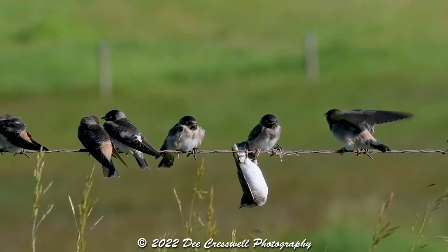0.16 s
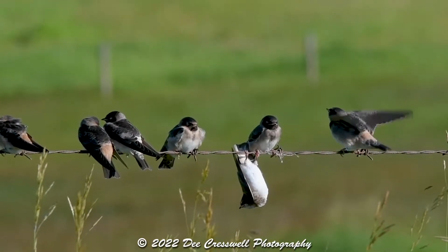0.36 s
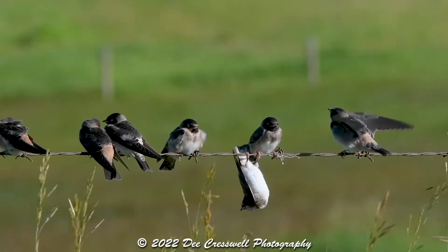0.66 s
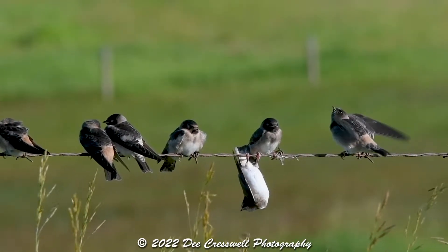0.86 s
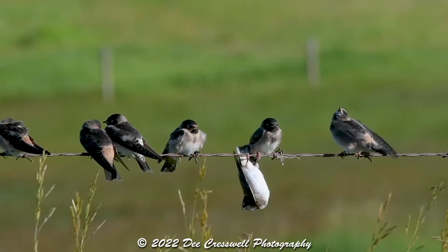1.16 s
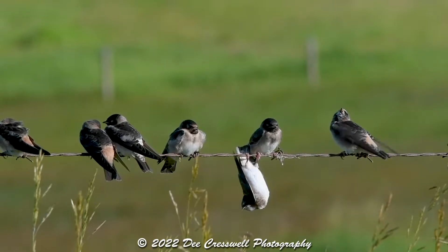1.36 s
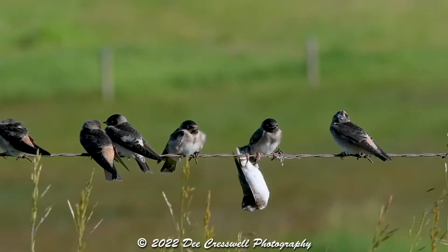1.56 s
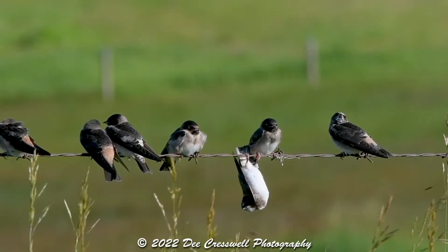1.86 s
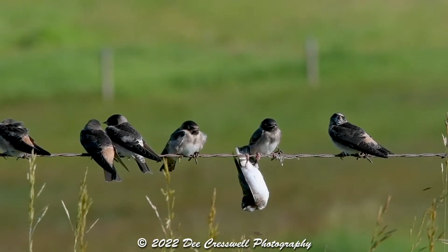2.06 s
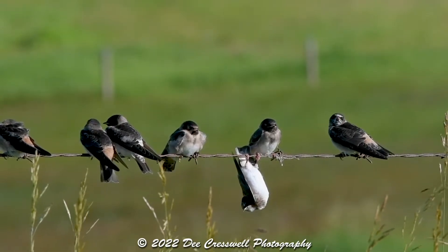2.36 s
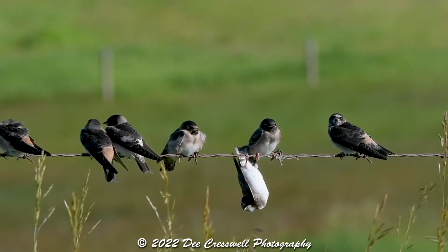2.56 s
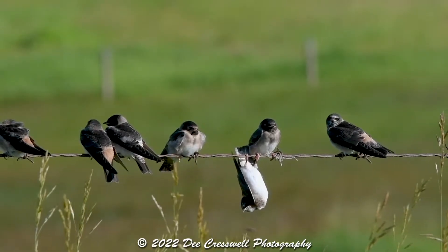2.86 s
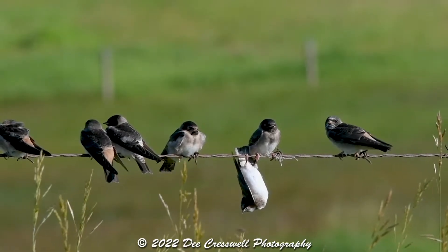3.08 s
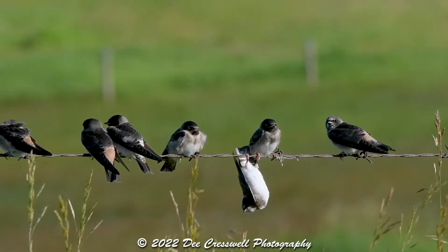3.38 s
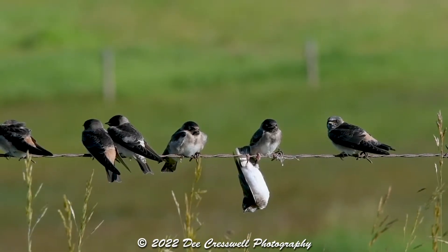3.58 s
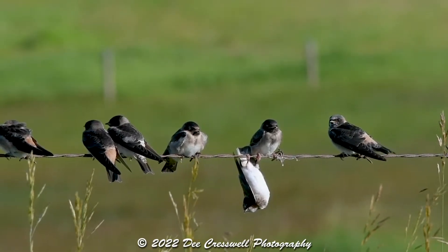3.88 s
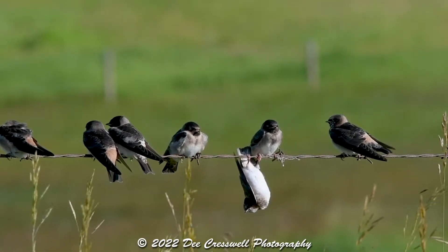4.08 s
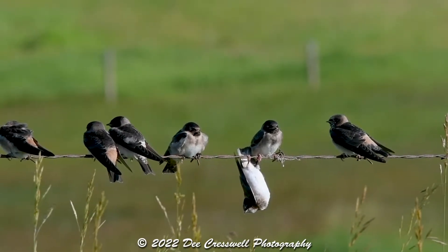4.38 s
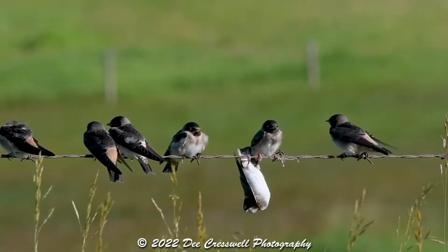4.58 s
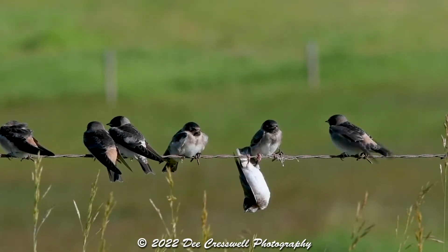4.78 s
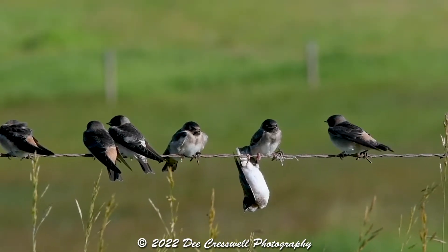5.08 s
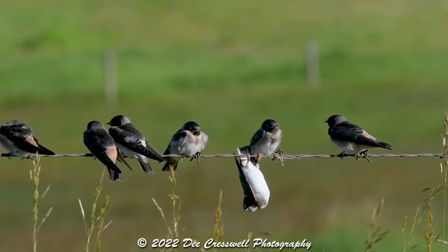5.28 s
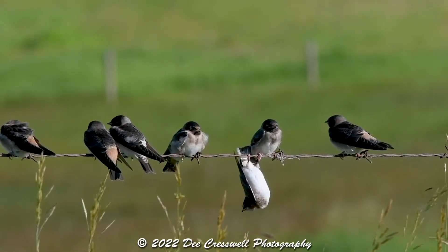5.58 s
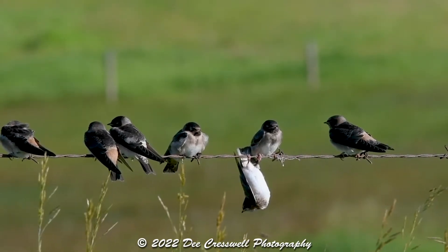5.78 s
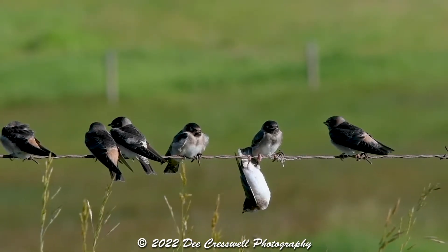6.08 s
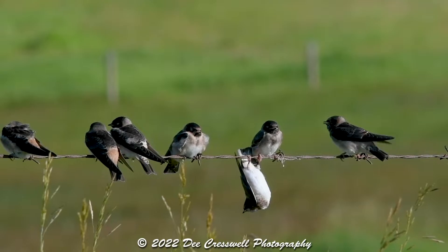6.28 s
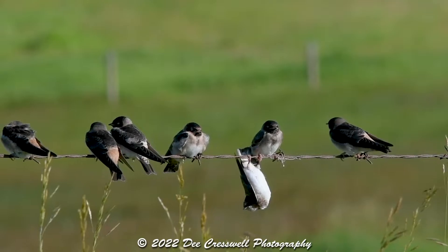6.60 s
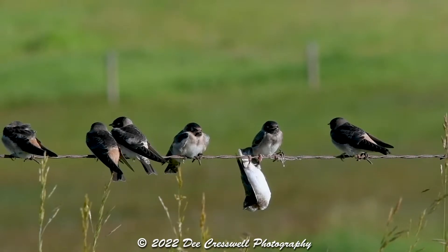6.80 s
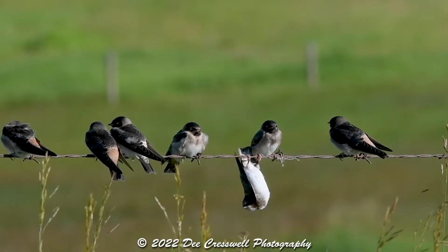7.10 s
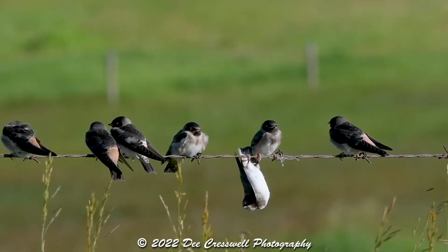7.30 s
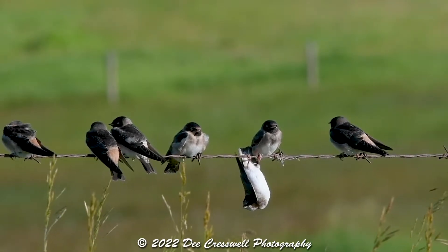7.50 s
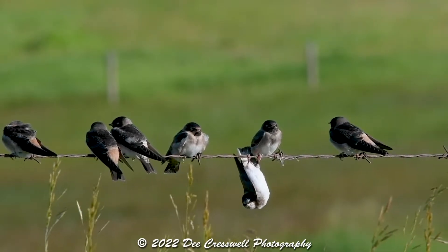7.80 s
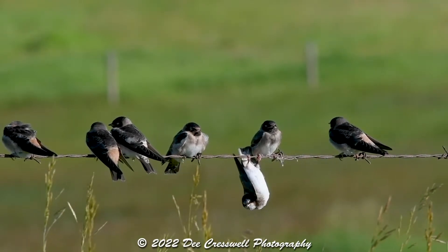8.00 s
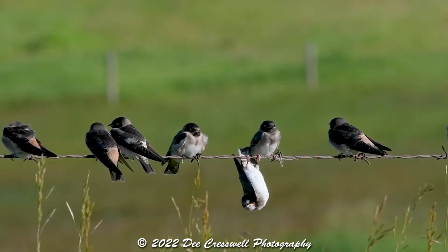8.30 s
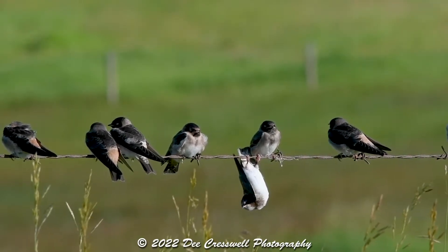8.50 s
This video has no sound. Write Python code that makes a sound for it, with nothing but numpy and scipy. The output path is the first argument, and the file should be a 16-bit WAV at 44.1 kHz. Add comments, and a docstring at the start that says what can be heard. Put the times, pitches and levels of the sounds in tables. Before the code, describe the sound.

Young swallows twitter outdoors in a quiet open field, centred and fairly close, with more of the flock chattering behind. From 0 seconds, short raspy chirps begin over two soft low microphone thumps. By 0.5 to 1.3 they overlap densely, each a quick rising lead-in and a fast buzzy warble. A lull around 1.3 to 1.6 leaves faint distant birds. Chatter resumes until 2.6, with sharp upward whistles, a hoarse low begging note near 2.0 and the strongest dull thump near 2.2. More bursts follow at 2.65 and 3.0, then a pause around 3.4 with another bump. From 4.1 to 5.9 the twittering is nearly continuous, thinning around 6.4. A bright, lively flurry peaks near 6.7 to 7.0 and calls continue to 8.6, with a short gap near 8.3. Weak wind rumble slowly eases underneath; a light grass rustle swells around 8.0. Almost no echo.

```python
"""Swallows twittering on a fence wire

Young swallows twitter with overlapping calls on a wire in an open field, the rest of the flock behind. Each
call is a rising lead-in and a fast warble: frequency modulation of two voices, one from each side of the
syrinx. Slurs are rising sinusoids, low hoarse notes are slower warbles, and rasp adds shaped noise. Low thumps
are damped oscillations of the microphone mount; filtered noise gives wind, grass and distance. A wavering far
tone lies under the very quiet countryside."""
import sys
import numpy as np
from scipy import signal
from scipy.fft import rfft, irfft, next_fast_len
from scipy.io import wavfile
from scipy.ndimage import uniform_filter1d

SR = 44100
rng = np.random.default_rng(int(sys.argv[2]) if len(sys.argv) > 2 else 0)


def unload_wav(signal):
    """Save mono or channel-first audio to the path in sys.argv[1] as 16-bit WAV at rate SR, clipped to [-1, 1]."""
    wavfile.write(
        sys.argv[1],
        SR,
        np.round(np.clip(np.atleast_2d(signal).T, -1, 1) * 32767).astype(np.int16),
    )


N = 381465
TIME = np.arange(N) / SR

# Bird levels hold before the shared colouring of beaks and air.
# Twitters on the wire: start_s, first_crest_s, end_s, pitch_hz, warble_rate_hz, level_db,
# second_voice_db (relative to the first voice, before SECOND_TRIM_DB)
TWITTERS = [(0.051, 0.1, .148, 2973, 43.1, -60.5, 1.5), (.18, 0.217, .295, 2878, 43.1, -61, 5),
            (.31, 0.36, .41, 3210, 41, -72, 16.5), (.546, 0.556, .592, 3330, 53.3, -52, -34),
            (0.589, .607, .67, 3326, 31.7, -51.5, -29), (0.681, 0.765, .83, 3430, 37.3, -64, -3),
            (.71, .742, .83, 4500, 43.6, -60, -1.5), (0.841, 0.859, .925, 3316, 36, -51, -23),
            (.87, .921, 1.01, 3265, 45.1, -54.5, -25), (0.894, 0.943, 1.035, 3344, 42.4, -50.5, -21),
            (1.01, 1.058, 1.12, 3230, 31.2, -63, 6), (1.126, 1.17, 1.2, 3345, 73, -51.5, -17),
            (1.19, 1.217, 1.29, 3415, 38.8, -54.5, -41), (1.585, 1.601, 1.635, 3090, 49.7, -69.5, -14),
            (1.649, 1.692, 1.73, 3290, 31.4, -58, -14), (1.745, 1.782, 1.87, 3343, 54.7, -50, -8.5),
            (1.77, 1.81, 1.87, 3470, 43.3, -48, -0.5), (1.879, 1.917, 2.02, 3400, 32.64, -52.5, -23),
            (1.92, 1.969, 2.02, 3540, 39, -56.5, -15), (2.03, 2.108, 2.19, 3706, 46, -54.5, -3),
            (2.071, 2.097, 2.185, 3336, 39, -56, -12), (2.193, 2.256, 2.315, 3350, 56.3, -51, -19),
            (2.298, 2.326, 2.37, 3460, 36.8, -53.5, -35), (2.38, 2.417, 2.46, 3800, 29.1, -58.5, -28),
            (2.444, 2.505, 2.562, 3440, 34, -52, -33), (2.641, 2.683, 2.735, 3150, 48.6, -52, -21),
            (2.76, 2.789, 2.85, 4670, 44, -56.5, -17), (2.795, 2.833, 2.91, 3080, 45.4, -59.5, -2.5),
            (3.02, 3.056, 3.11, 3750, 47.5, -61, 10), (3.045, 3.095, 3.135, 3140, 54.7, -49.5, -14),
            (3.124, 3.187, 3.225, 3660, 29.9, -51, -7.5), (3.227, 3.268, 3.32, 3373, 49.9, -53.5, -5),
            (3.53, 3.57, 3.62, 3940, 29.1, -69, -7), (3.606, 3.648, 3.72, 3055, 54.6, -48.5, -16),
            (3.638, 3.676, 3.75, 3463, 34.2, -54.5, -13), (3.725, 3.757, 3.775, 3050, 29.3, -46.5, -5),
            (3.836, 3.882, 3.96, 3670, 32.66, -61.5, 1.5), (4.091, 4.132, 4.21, 3834, 41.3, -49.5, -5),
            (4.117, 4.149, 4.24, 3350, 52.5, -52.5, 3.5), (4.242, 4.285, 4.335, 3490, 34.3, -50, -27),
            (4.37, 4.406, 4.455, 3460, 31.1, -53.5, -19), (4.342, 4.374, 4.45, 3960, 43.2, -56.5, 0.5),
            (4.448, 4.471, 4.525, 3390, 30.5, -54.5, -10), (4.523, 4.539, 4.62, 2790, 25, -61, -11),
            (4.579, 4.612, 4.692, 3054, 32.26, -53.5, -29), (4.684, 4.713, 4.76, 3100, 31.6, -52.5, -4),
            (4.832, 4.878, 4.93, 3175, 54.7, -48, -5), (4.921, 4.958, 5.02, 3500, 25.1, -61.5, -19),
            (5.04, 5.085, 5.155, 3636, 30.76, -48, -16), (5.044, 5.068, 5.135, 3317, 49.9, -46, -13),
            (5.124, 5.184, 5.215, 3690, 30.1, -57.5, -6), (5.218, 5.252, 5.33, 3700, 33.35, -53.5, -8),
            (5.294, 5.357, 5.425, 3150, 36.6, -51, -25), (5.342, 5.379, 5.42, 3430, 50.5, -53, -26),
            (5.42, 5.445, 5.53, 3890, 33.4, -65, -11), (5.56, 5.626, 5.68, 2850, 30, -71.5, -3),
            (5.676, 5.729, 5.79, 3776, 51.1, -57.5, 5.5), (5.763, 5.797, 5.85, 3570, 34.2, -50, -3),
            (5.824, 5.861, 5.91, 3160, 40.5, -63.5, -29), (6.018, 6.062, 6.12, 3600, 35, -55.5, -1),
            (6.059, 6.077, 6.135, 3310, 31.45, -54, -3), (6.128, 6.147, 6.23, 3286, 31, -50, -22),
            (6.212, 6.266, 6.37, 3850, 41.7, -60, -16), (6.528, 6.57, 6.67, 3236, 32.15, -60, 1),
            (6.668, 6.698, 6.79, 3470, 38.27, -48.5, -16), (6.71, 6.747, 6.83, 3532, 34.9, -48.5, -3),
            (6.816, 6.845, 6.88, 3470, 73, -48, -25), (6.876, 6.914, 6.97, 3730, 42.2, -46, -3),
            (6.901, 6.96, 7.022, 3195, 59.7, -45, -9), (7.015, 7.027, 7.08, 3850, 31.2, -61.5, -3),
            (7.08, 7.129, 7.2, 4750, 43.3, -57, -2.5), (7.098, 7.132, 7.255, 3340, 32.5, -52.5, -28),
            (7.269, 7.323, 7.375, 3370, 30.6, -56.5, -6), (7.38, 7.429, 7.53, 3430, 43.2, -50, -11),
            (7.44, 7.477, 7.6, 3486, 40.8, -58.5, -11), (7.518, 7.559, 7.63, 3770, 34.9, -67, 8.5),
            (7.657, 7.728, 7.77, 3008, 39.8, -62, 6.5), (7.85, 7.904, 7.965, 3460, 34.35, -50.5, -30),
            (7.966, 7.985, 8.08, 3354, 37.04, -50, -4), (8.062, 8.118, 8.2, 3470, 46.2, -50.5, -16),
            (8.096, 8.122, 8.25, 3466, 42.1, -51.5, -37), (8.386, 8.417, 8.47, 3500, 28.1, -70.5, 8),
            (8.494, 8.533, 8.615, 3530, 30.76, -54.5, -13), (8.544, 8.592, 8.65, 3684, 46.3, -58, -23)]
# Clear rising slurs: start_s, end_s, from_hz, level_db
SLURS = [(.32, 0.358, 2400, -64), (0.527, 0.556, 3060, -65), (0.538, 0.553, 2100, -75),
         (5.032, 5.078, 2360, -54), (1.115, 1.184, 3850, -62.5), (1.647, 1.682, 3950, -56.5),
         (2.043, 2.066, 5200, -44), (3.012, 3.057, 5200, -48.5), (3.221, 3.262, 4050, -53.5),
         (6.912, 6.94, 5250, -47.5), (7.076, 7.122, 4000, -52.5), (7.669, 7.703, 2550, -63.5),
         (7.805, 7.875, 2470, -53.5)]
# Low hoarse notes: start_s, end_s, pitch_hz, level_db (of the first voice)
LOW_HOARSE_NOTES = [(0.903, 1.08, 1590, -66.5), (1.989, 2.087, 1590, -58.5), (2.247, 2.303, 1660, -67),
                    (2.77, 2.87, 1876, -68.5), (3.858, 3.972, 1710, -56), (4.977, 5.065, 1420, -67),
                    (6.01, 6.064, 1710, -66.5), (6.236, 6.492, 1780, -70), (6.484, 6.602, 1570, -67),
                    (7.423, 7.512, 1960, -67), (8.038, 8.259, 1754, -62)]
# Outbursts of the flock behind: start_s, end_s, chatter_db, rasp_db
OUTBURSTS = [(0.08, 0.128, -59, -63.5), (0.195, 0.295, -50.5, -55), (0.316, 0.414, -57.5, -61.5),
             (0.576, 0.702, -60.5, -82), (0.715, 0.816, -53, -58.5), (0.843, 1.103, -51.5, -52.5),
             (1.162, 1.291, -54, -57), (1.325, 1.485, -86, -94), (1.648, 1.731, -57.5, -78),
             (1.769, 2.006, -49, -62.5), (2.041, 2.178, -47, -53.5), (2.216, 2.351, -51.5, -57),
             (2.416, 2.529, -52, -72), (2.671, 2.718, -59, -67.5), (2.783, 2.861, -55.5, -51),
             (3.018, 3.152, -54.5, -57), (3.23, 3.347, -56, -61.5), (3.64, 3.744, -49.5, -61.5),
             (3.86, 3.931, -61.5, -60.5), (4.102, 4.266, -51, -57.5), (4.263, 4.444, -49.5, -62),
             (4.523, 4.628, -52, -50), (4.603, 4.816, -54.5, -63.5), (4.833, 5.002, -57.5, -69.5),
             (5.015, 5.491, -57, -67), (5.555, 5.656, -57, -71.5), (5.709, 5.871, -53, -59.5),
             (5.914, 6.24, -58, -65), (6.217, 6.355, -59, -58.5), (6.549, 6.662, -51.5, -54.5),
             (6.682, 7.021, -50, -55.0), (7.122, 7.248, -51.5, -57), (7.305, 7.615, -54.5, -70),
             (7.676, 7.875, -58.5, -68.5), (7.926, 8.255, -51, -57.5), (8.39, 8.457, -64.5, -72),
             (8.503, 8.62, -52, -64)]
# Relative spectrum of the rasp: frequency_hz, density_db (per Hz)
RASP_SPECTRUM = [(1000, 2), (1600, -5), (2300, 17.5), (3000, 14), (4500, 1), (5600, 19), (7000, 3.5),
                 (8500, 7.5), (10000, 7.5), (12500, -5.5)]
# Swells of the far birds, Gaussian in time: centre_s, half_length_s, level_db
FAR_SWELLS = [(1.41, 0.081, -73.5), (2.967, 0.036, -71.5), (3.413, 0.12, -77), (6.418, 0.023, -69)]
# Colour of the far birds: frequency_hz, gain_db
FAR_COLOUR = [(1200, -18), (1900, 19), (2600, -4.5), (4000, 0.5), (5000, -7.5), (7000, -10), (12000, -38)]
# How the beaks and the air colour the voices: frequency_hz, gain_db
BEAK_COLOUR = [(700, -47), (1200, -23), (1700, -16), (2150, -8.5), (2600, 1.5), (4600, 1.5), (5300, -6),
               (6800, -5.5), (8500, -7.5), (10000, -15), (12000, 0), (13000, -3.5), (15000, -18.5)]
# Bumps on the microphone: centre_s, peak_db, ring_hz, rise_s
THUMPS = [(0.063, -40, 74.6, 0.012), (0.126, -45, 86, 0.0054), (0.76, -59, 49, .011),
          (.967, -57, 46.5, 0.012), (2.109, -46, 61.7, 0.015), (2.185, -34.5, 54.4, 0.025),
          (2.543, -59, 45, 0.031), (3.132, -57, 128, 0.0035), (3.172, -56, 68, 0.0094),
          (3.331, -53, 62, 0.0092), (3.409, -41.5, 62, 0.02), (3.949, -49, 62, 0.024),
          (4.304, -48.5, 62.4, 0.016), (5.013, -54, 65.6, 0.0067), (6.78, -56.5, 67, 0.012)]
# Relative spectrum of wind on the microphone: frequency_hz, density_db (per Hz)
RUMBLE_SPECTRUM = [(13, -64), (22, -24), (42, -1.5), (60, 1), (129, -9), (157, -15.5), (210, -21),
                   (350, -29.5), (400, -28.5), (520, -55), (880, -120)]
# Relative spectrum of the rustling grass: frequency_hz, density_db (per Hz)
GRASS_SPECTRUM = [(150, 2), (300, 2.5), (385, 1), (480, 4.5), (650, 5.5), (780, 2.5), (950, 6), (1100, -2),
                  (1400, -3), (3000, 2), (6000, -5.5), (11000, -25), (14000, -27.5)]
# Gusts that stir the grass, Gaussian in time: centre_s, half_length_s, level_db (before GRASS_GAIN_DB)
GUSTS = [(3.007, 0.065, -90.5), (3.203, 0.088, -89), (3.82, 0.062, -93.5), (5.52, 0.077, -96.5),
         (6.173, 0.29, -93.5), (7.158, .15, -100), (8.016, 0.19, -79.5), (8.607, 0.36, -90.5)]
# The microphone's two ports fall out of step around a resonance and in the top treble:
# frequency_hz, left_lag_rad
PORT_LAG = [(3750, 0), (4150, .2), (4600, .7), (4850, 1.4), (5030, 3.1), (5250, 5), (5750, 6.27),
            (7500, 6.29), (7650, 6.85), (10500, 8.1), (13000, 9.4)]

# Pitch swing: higher notes swing wider, faster warbles swing less
TYPICAL_HZ, TYPICAL_RATE_HZ = 3400, 38
SWING_HZ, PITCH_EXPONENT, RATE_EXPONENT = 405, 2.147, 0.498  # swing at the typical pitch and rate
SWING_LIMIT_HZ = 756
DRIFT_HZ, LIFT_HZ = -63, 336.9  # sag over a warble; lift of the lead-in before its slope
GAP_HZ, GAP_SPREAD_HZ = 1358, 430  # second voice above the first; how much that differs from call to call
# Loudness: a longer lead-in is sung with more force; short warbles swell, long ones fade
TYPICAL_LEAD_S, LEAD_DB, LEAD_GAIN_DB_PER_S = 0.031, -4, 146  # lead-in against the warble
TYPICAL_WARBLE_S, SWELL_DB, TIRE_DB_PER_S = 0.052, 1.5, 69.5
SECOND_TRIM_DB = -3.5
OVERTONE_DB, OVERTONE_WITH_STRAIN = -22.5, 0.58  # overtones rise with the second voice, in dB per dB
SLUR_RISE_HZ_PER_S = 15000
OUTBURST_RISE_DB_PER_S, OUTBURST_FALL_DB_PER_S, OUTBURST_ARCH_DB = 617.5, 408, 6
THUMP_DECAY_S = 0.021
RUMBLE_START_DB, WIND_DROP_DB_PER_S = -72.5, 0.56
CALM_DB, GRASS_GAIN_DB = -96, 6  # grass between gusts, before the gain; gain of all centred rustle
TOP_HZ = 15000


def undb(db):
    """Logarithmic level: convert decibels to an amplitude ratio."""
    return 10 ** (np.asarray(db) / 20)


def unit(x):
    """Mean power: scale a sound to rms 1."""
    return x / np.sqrt(np.mean(x ** 2) + 1e-20)


def even(x, size=1500):
    """Level compression: divide by the running rms over `size` samples."""
    return x / np.sqrt(uniform_filter1d(x ** 2, size=size) + 1e-3)


def colour(x, points):
    """Linear filtering: multiply the spectrum by a gain drawn through (Hz, dB) points."""
    hz, db = np.transpose(points)
    size = next_fast_len(N + 4096)
    f = np.maximum(np.arange(size // 2 + 1) * SR / size, 1)
    gain = undb(np.interp(np.log(f), np.log(hz), db))
    return irfft(rfft(x, size) * gain, size)[..., :N]


def waver(t, rate):
    """Random modulation: straight lines between `rate` random knots a second, with rms near 1.2."""
    knots = rng.standard_normal(8192)
    return 1.51 * np.interp((t - t[0]) * rate, np.arange(len(knots)), knots)


def span(start, end):
    """Sampling: the sample times between two moments."""
    return TIME[max(int(start * SR), 0):int(end * SR)]


def add(track, t, sound):
    """Superposition: add a sound to a track at its sample times."""
    first = int(round(t[0] * SR))
    track[first:first + len(t)] += sound


def call(t, crest, pitch, swing, rate, drift, lift, gap, swell_db, lead_db, jitter_hz, trough_db,
         rise_hz_per_s=11000, attack_s=0.01, release_s=0.011, flutter_db=2.39, second_jitter_hz=50,
         fade_in_db_per_s=130):
    """Frequency modulation: syrinx muscles swing the pitch; gives first voice, second voice, overtones."""
    turns = (t - crest) * rate
    before = np.maximum(-.5 - turns, 0) / rate  # seconds left until the trough that opens the warble
    progress = np.maximum(t - crest, 0) / (t[-1] - crest)
    warble = np.cos(2 * np.pi * np.maximum(turns, -.5))
    # the lead-in rises steadily, then drops into the trough over its last 8 ms
    lead = lift * np.clip(before / .008, 0, 1) - rise_hz_per_s * before
    hz = pitch + swing * warble + drift * progress + lead + jitter_hz * waver(t, 1500)
    low = 2 * np.pi * np.cumsum(hz) / SR
    gap_hz = gap + second_jitter_hz * waver(t, 600)
    high = low + 2 * np.pi * np.cumsum(gap_hz) / SR

    # the two sides of the syrinx load each other, which adds sum and difference tones
    second = np.sin(high) + undb(-11.0) * np.sin(2 * high - low) + undb(-15.5) * np.sin(2 * low - high)
    overtones = (np.sin(2 * low) + undb(-3.5) * np.sin(low + high) + undb(-13.5) * np.sin(2 * high)
                 + undb(-2) * np.sin(3 * low) + undb(-2) * np.sin(2 * low + high))

    lead_level = lead_db * np.clip(-2 * turns - .5, 0, 1) - fade_in_db_per_s * before
    warble_level = swell_db * (progress - .5) + trough_db * warble / 2  # crests louder than troughs
    level_db = lead_level + warble_level + flutter_db * waver(t, 222.6)
    edges = np.clip((t - t[0]) / attack_s, 0, 1) * np.clip((t[-1] - t) / release_s, 0, 1)
    return np.sqrt(2) * np.array([np.sin(low), second, overtones]) * undb(level_db) * edges


def near_birds():
    """Scaling law: calls on the wire share one build, and pitch and rate set the width of the swing."""
    out = np.zeros(N)
    chances = rng.standard_normal(len(TWITTERS))
    for (start, crest, end, pitch, rate, db, second_db), chance in zip(TWITTERS, chances):
        t = span(start, end)
        pitch_factor = (pitch / TYPICAL_HZ) ** PITCH_EXPONENT
        rate_factor = (TYPICAL_RATE_HZ / rate) ** RATE_EXPONENT
        swing = min(SWING_HZ * pitch_factor * rate_factor, SWING_LIMIT_HZ)
        swell_db = SWELL_DB - TIRE_DB_PER_S * (end - crest - TYPICAL_WARBLE_S)
        lead_db = min(LEAD_DB + LEAD_GAIN_DB_PER_S * (crest - start - TYPICAL_LEAD_S), 0)
        gap = GAP_HZ + GAP_SPREAD_HZ * chance
        first, second, overtones = call(t, crest, pitch, swing, rate, DRIFT_HZ, LIFT_HZ, gap,
                                        swell_db, lead_db, jitter_hz=29.7, trough_db=4)
        overtone_db = OVERTONE_DB + OVERTONE_WITH_STRAIN * second_db
        voices = first + undb(second_db + SECOND_TRIM_DB) * second + undb(overtone_db) * overtones
        add(out, t, undb(db) * voices)
    return out


def slurs(jitter_hz=25):
    """Linear frequency sweep: smooth upward whistles that swell and stop."""
    out = np.zeros(N)
    for start, end, from_hz, db in SLURS:
        t = span(start, end)
        progress = np.linspace(0, 1, len(t))
        hz = from_hz + SLUR_RISE_HZ_PER_S * (t - start) + jitter_hz * waver(t, 670)
        envelope = np.sqrt(2 * abs(np.sin(np.pi * progress)))
        add(out, t, undb(db) * envelope * np.sin(2 * np.pi * np.cumsum(hz) / SR))
    return out


def low_hoarse_notes(rate_hz=31, swing_hz=170):
    """Joint amplitude and frequency modulation: low, hoarse notes pulse with each swing."""
    out = np.zeros(N)
    for start, end, pitch, db in LOW_HOARSE_NOTES:
        t = span(start, end)
        first, second, overtones = call(t, start + .02, pitch, swing_hz, rate_hz, drift=0, lift=0, gap=700,
                                        swell_db=0, lead_db=-8, jitter_hz=150, trough_db=12)
        add(out, t, undb(db) * (first + undb(-27) * second + undb(-18.0) * overtones))
    return out


def flock(pitch_hz=3400, spread_hz=400, swing_hz=520, second_db=-4, count=115):
    """Random superposition: about two more calls at any moment; gives voices and harsh upper partials."""
    voices, harsh = np.zeros((2, N))
    for k, (delay, pitch, swing, rate, length) in enumerate(rng.uniform(-1, 1, (count, 5))):
        start = (k + delay / 2) / count * TIME[-1] - .05
        t = span(start, start + .17 + .03 * length)
        first, second, overtones = call(
            t, start + .06, pitch_hz + spread_hz * pitch, swing_hz * (1 + 0.2462 * swing), 40 + 10 * rate,
            drift=-80, lift=300, gap=1300 + 250 * length,
            swell_db=-2, lead_db=-2, jitter_hz=25, trough_db=2)
        add(voices, t, first + undb(second_db) * second)
        add(harsh, t, overtones + undb(-23.5) * second)
    return even(voices), even(harsh)


def rasp(harsh, voiced_db=0.2, hiss_db=-9.5, surge_db=.7):
    """Hard-driven voices: warbling upper partials with a little hoarse, noisy hiss between them."""
    voiced = even(unit(colour(harsh, RASP_SPECTRUM)), size=400)
    hiss = unit(colour(rng.standard_normal(N), RASP_SPECTRUM))
    return (undb(voiced_db) * voiced + undb(hiss_db) * hiss) * undb(surge_db * waver(TIME, 22))


def outbursts():
    """Addition of powers: flare-ups peak mid-way and die down; gives the gains of chatter and rasp."""
    chatter_power, rasp_power = np.zeros((2, N))
    for start, end, chatter_db, rasp_db in OUTBURSTS:
        t = span(start - .1, end + .15)
        arch = np.clip((2 * t - start - end) / (end - start), -1, 1) ** 2
        rise_db = -OUTBURST_RISE_DB_PER_S * np.maximum(start - t, 0)
        fall_db = -OUTBURST_FALL_DB_PER_S * np.maximum(t - end, 0)
        shape_db = rise_db + fall_db - OUTBURST_ARCH_DB * arch
        add(chatter_power, t, undb(chatter_db + shape_db) ** 2)
        add(rasp_power, t, undb(rasp_db + shape_db) ** 2)
    return np.sqrt(chatter_power), np.sqrt(rasp_power)


def field_echo(x, t60_s, size=14000):
    """Diffuse scattering: grass and fence posts return a noisy tail that falls 60 dB in t60_s."""
    t = np.arange(size) / SR
    tail = rng.standard_normal(size) * undb(-60 * t / t60_s) * (1 - np.exp(-t / 0.0028))
    return signal.fftconvolve(x, tail / np.linalg.norm(tail))[:N]


def far_birds(chatter, blur_s=0.42):
    """Propagation over distance: chatter from across the field arrives dull and smeared."""
    swells = sum(undb(db) * np.exp(-((TIME - s) / half) ** 2) for s, half, db in FAR_SWELLS)
    blurred = field_echo(chatter, blur_s) + undb(-3) * rng.standard_normal(N)
    return swells * unit(colour(blurred, FAR_COLOUR))


def thumps(knock_db=-15):
    """Damped oscillation: each bump swings the microphone mount for a few cycles, with a dull knock."""
    out = np.zeros(N)
    knock_spectrum = [(20, -10), (50, 6), (130, -3), (220, -31.0), (500, -58), (2000, -92)]  # (Hz, dB)
    knock = unit(colour(rng.standard_normal(N), knock_spectrum))
    for s, db, hz, rise in THUMPS:
        t = span(s - .1, s + .25)
        rising = np.exp(-((t - s) / rise) ** 2)
        decaying = np.exp(-abs(t - s) / THUMP_DECAY_S)
        envelope = np.where(t < s, rising, decaying)
        swing = np.cos(2 * np.pi * hz * (t - s))
        add(out, t, undb(db) * envelope * (swing + undb(knock_db) * np.interp(t, TIME, knock)))
    return out


def wind(side_db=-83, buffet_db=2, stir_db=-3.5):
    """Turbulence noise: unsteady centred rumble, centred rustle that swells in gusts, steady side rustle."""
    rumble_db = RUMBLE_START_DB - WIND_DROP_DB_PER_S * TIME + buffet_db * waver(TIME, 11)
    rumble = unit(colour(rng.standard_normal(N), RUMBLE_SPECTRUM)) * undb(rumble_db)
    # mid and side are scaled together, to a joint rms of 1
    mid, side = unit(colour(rng.standard_normal((2, N)), GRASS_SPECTRUM))
    calm = undb(CALM_DB + stir_db * waver(TIME, 8))
    gusts = sum(undb(db) * np.exp(-((TIME - s) / half) ** 2) for s, half, db in GUSTS)
    rustle = mid * (calm + gusts) * undb(GRASS_GAIN_DB)
    width = np.array([[1], [-1]]) * side * undb(side_db)  # opposite sign left and right
    return rumble + rustle + width


def hum(hz=210, db=-96, waver_db=3):
    """Slow random modulation: a faint tone from far away wavers in pitch and level."""
    phase = 2 * np.pi * np.cumsum(hz * (1 + 0.011 * waver(TIME, 30))) / SR
    return np.sqrt(2) * undb(db + waver_db * waver(TIME, 1.9)) * np.sin(phase)


def scene():
    """Superposition of sources: all birds sit straight ahead; only the rustle has width."""
    chatter_gain, rasp_gain = outbursts()
    chatter, harsh = flock()
    soloists = near_birds() + slurs() + low_hoarse_notes()
    flock_behind = chatter * chatter_gain + rasp(harsh) * rasp_gain
    birds = colour(soloists + flock_behind + far_birds(chatter), BEAK_COLOUR)
    echo = undb(-18) * field_echo(birds, t60_s=.11)
    return birds + echo + thumps() + wind() + hum()


def record(dry):
    """Phase dispersion and band limiting: the left port lags in the treble; a low-pass cuts the top."""
    lag = np.interp(np.arange(N // 2 + 1) * SR / N, *np.transpose(PORT_LAG))
    left = irfft(rfft(dry[0]) * np.exp(-1j * lag), N)
    ports = np.array([left, dry[1]])
    return signal.sosfilt(signal.ellip(8, .2, 70, TOP_HZ, fs=SR, output="sos"), ports)


dry = scene()
out = record(dry)
unload_wav(out)
```